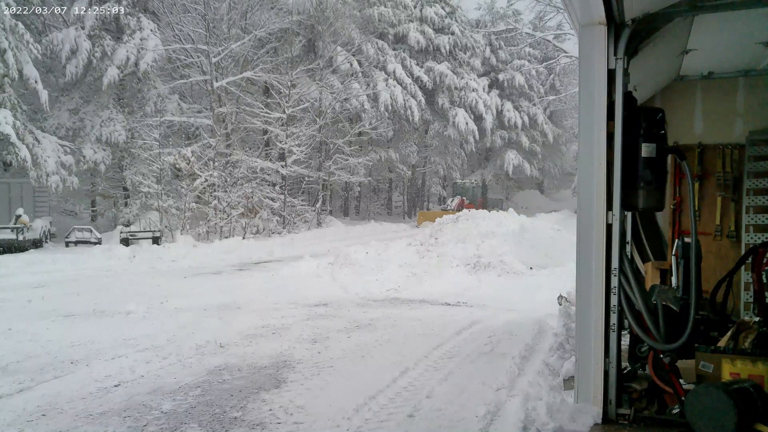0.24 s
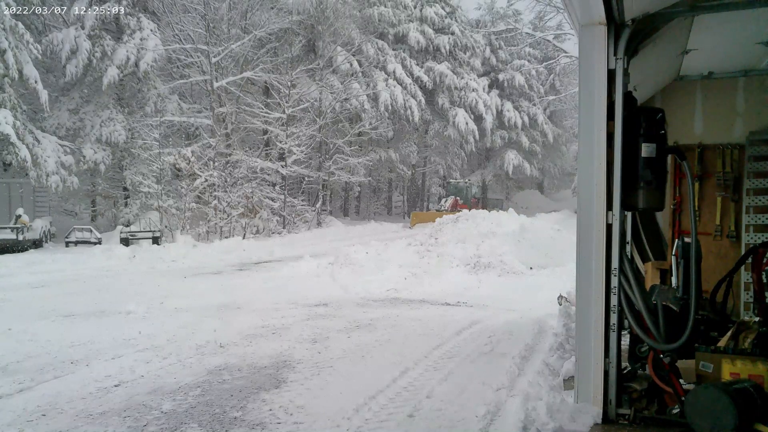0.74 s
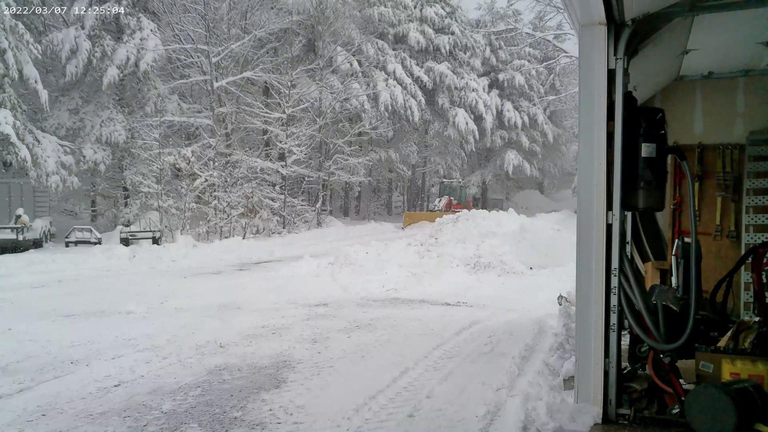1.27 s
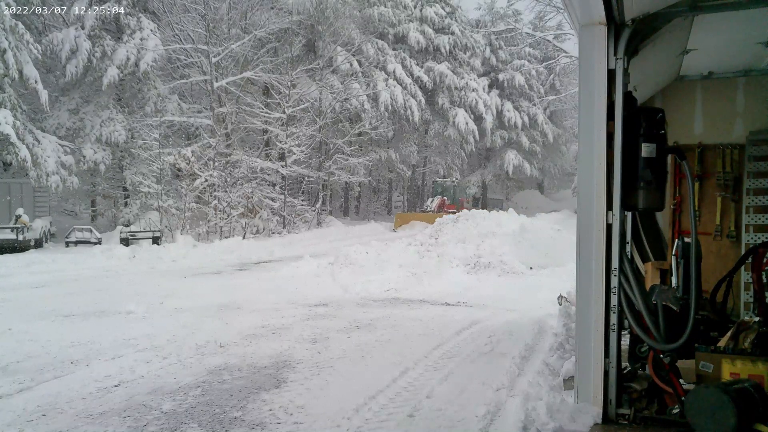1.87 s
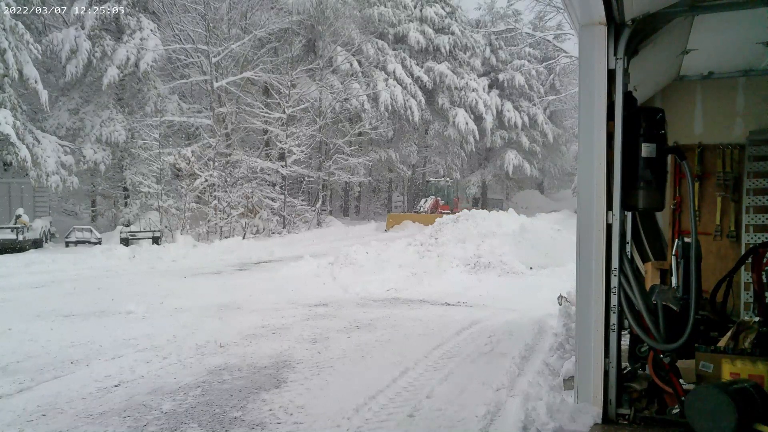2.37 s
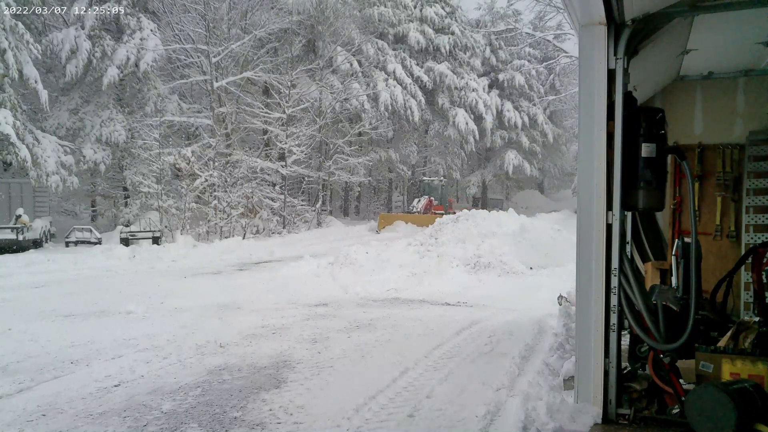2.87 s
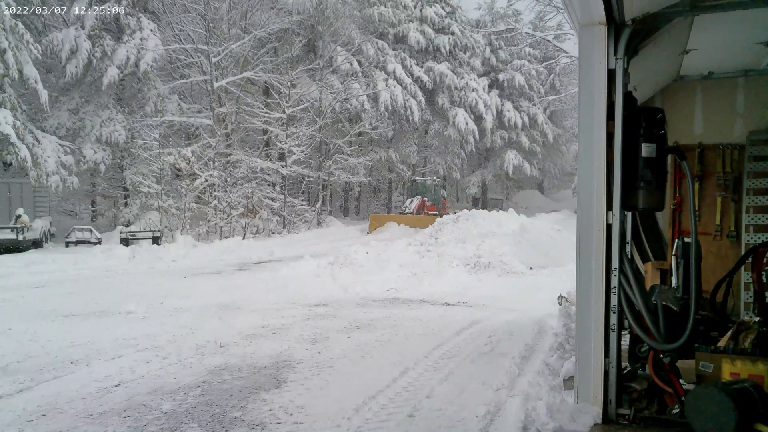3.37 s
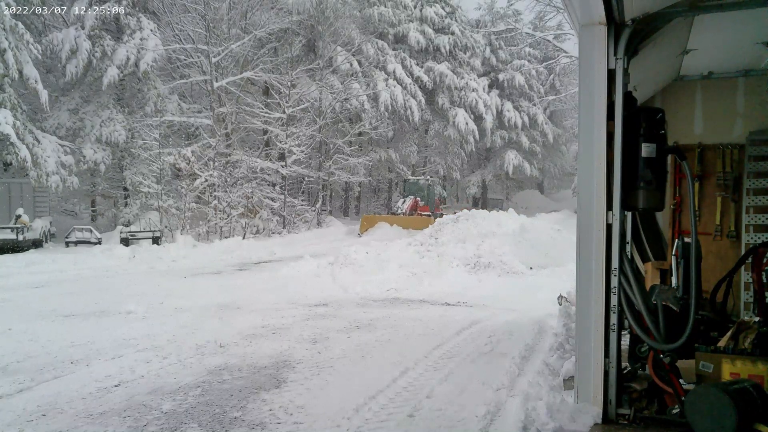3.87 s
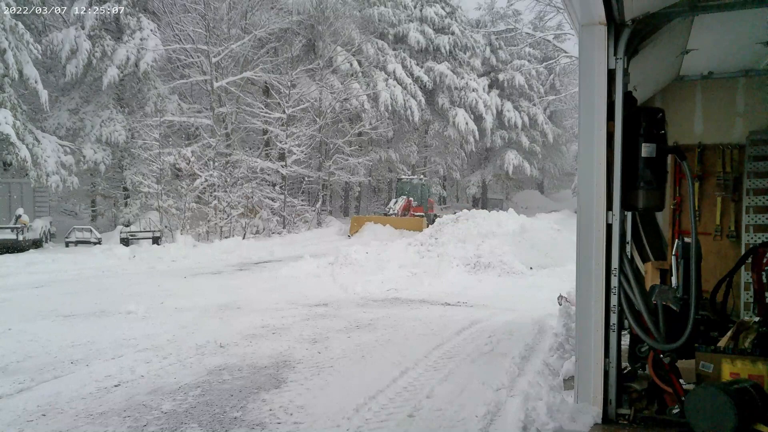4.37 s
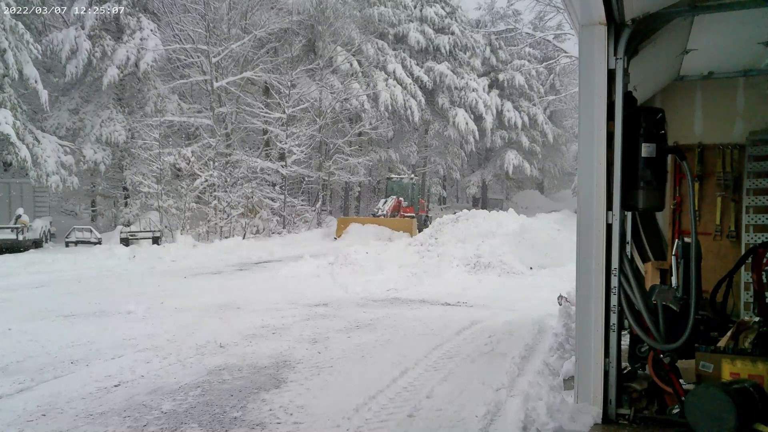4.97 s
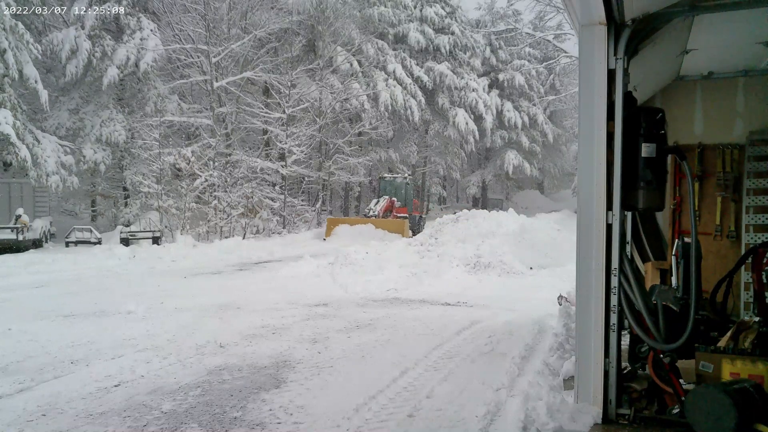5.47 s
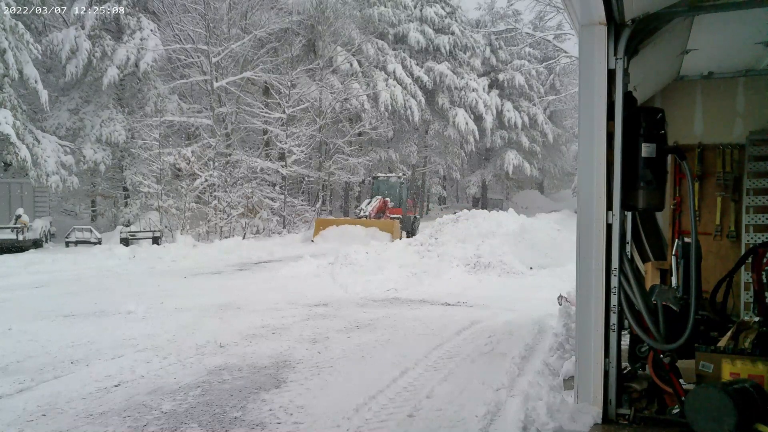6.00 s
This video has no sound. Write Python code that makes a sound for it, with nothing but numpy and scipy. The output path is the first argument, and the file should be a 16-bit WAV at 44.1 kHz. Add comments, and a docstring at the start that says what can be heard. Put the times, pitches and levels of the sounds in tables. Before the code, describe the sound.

A wheel loader's diesel drones from far across a snowy yard, heard from an open garage. Low firing tones sit in a slowly growing noisy roar over a rolling rumble, with a thin wavering gear whine and occasional dull blade thuds. Near the end the blade digs in: crowded bumps, lumpy rumble, steel scrape and ice cracks, while the engine note sags.

```python
"""Far across a yard, a wheel loader pushes wet snow towards an open garage where the microphone stands.
From the start a diesel drones as firing tones in a slowly growing noise roar, over a rolling rumble.
A wavering near-sine gear whine enters at 0.3 s; blade bumps, short decaying rings, come from 0.9 s.
From 4.8 s the blade digs in: a lumpy noise rumble, a scrape, and ice cracks that ring the plate modes.
Bumps crowd together, and after 5.2 s the load drags the firing rate down."""
import sys
import numpy as np
from scipy import signal
from scipy.io import wavfile
from scipy.ndimage import uniform_filter1d

SR = 44100
rng = np.random.default_rng(int(sys.argv[2]) if len(sys.argv) > 2 else 0)


def how_loud(loudness_db):
    """Turn decibels into a plain amplitude multiplier (0 dB gives 1, 20 dB gives 10)."""
    steps = np.asarray(loudness_db, float) / 20
    return 10 ** steps


def materialize(psi):
    """Save the field psi as 16-bit PCM at rate SR to the path in sys.argv[1].

    A 1-D psi becomes a single channel; in a 2-D psi each row is a channel.
    """
    bounded = np.clip(np.atleast_2d(psi).T, -1, 1)
    quanta = np.round(bounded * 32767).astype(np.int16)
    wavfile.write(sys.argv[1], SR, quanta)


N = 275184  # length in samples


def evened(x):
    """Scales a sound to an rms of one."""
    return x / np.sqrt(np.mean(x ** 2) + 1e-20)


def read(points, hz):
    """Reads a spectrum between its points, along a logarithmic frequency axis."""
    f, value = np.transpose(points)
    return np.interp(np.log(hz + 1), np.log(f + 1), value)


def curve(rows, column):
    """Draws one column of a table as straight lines over the whole scene; column 0 is the time."""
    rows = np.array(rows)
    return np.interp(np.arange(N) / SR, rows[:, 0], rows[:, column])


def add(mix, start_s, sound):
    """Lays a sound into the mix, cut off at the end of the scene."""
    part = mix[round(start_s * SR):][:len(sound)]
    part += sound[:len(part)]


def drift(size):
    """Slow chance of rms one, smoothed twice over size samples."""
    return evened(uniform_filter1d(uniform_filter1d(rng.standard_normal(N), size), size))


def noise(spectrum, patchy_db, flicker_db, size, peaks=()):
    """Random short-time spectra with drifting patches and a flicker shared by all bands."""
    frames, hz = 4 * N // size + 5, np.fft.rfftfreq(size, 1 / SR)
    real, imaginary, patches = rng.standard_normal((frames, len(hz), 3)).T
    patches = evened(uniform_filter1d(uniform_filter1d(patches, 9, 0), 7, 1))
    flicker = evened(uniform_filter1d(rng.standard_normal(frames), 3))
    colour_db = read(spectrum, hz)
    for peak_hz, width_hz, db in peaks:
        colour_db = colour_db + db / (1 + (2 * (hz - peak_hz) / width_hz) ** 2)
    level_db = colour_db[:, None] + patchy_db * patches + flicker_db * flicker
    spectra = (real + 1j * imaginary) * how_loud(level_db)
    return evened(signal.istft(spectra, nperseg=size, noverlap=3 * size // 4)[1][:N])


# rolling rumble of tyres and pushed snow, relative: frequency_hz, density_db (per Hz)
GROUND = [(10, -15), (30, 5.5), (45, 4), (65, -26), (100, 3), (135, 3.5), (185, -0.5), (215, -9),
          (300, -15), (400, -61), (600, -68)]


def rolling():
    """Tyres and pushed snow make an uneven low rumble between the engine tones."""
    level_db = -45.5
    return how_loud(level_db) * noise(GROUND, patchy_db=.4, flicker_db=.3, size=2048)


# gear whine before its wavering dips: time_s, level_db
WHINE = [(.3, -67), (.5, -45.5), (.8, -57), (.92, -44), (1.05, -52), (1.15, -49), (1.4, -47), (1.55, -55),
         (1.75, -52), (2.02, -45), (2.3, -60), (2.58, -50), (2.8, -50), (3, -58), (3.28, -47), (3.4, -47.5),
         (3.52, -49), (3.7, -42.5), (3.8, -46), (3.98, -54), (4.2, -43.5), (4.4, -51), (4.52, -54),
         (4.75, -47.5), (5.2, -60), (5.4, -70)]
# gear whine before its wobble: time_s, pitch_hz
WHINE_PITCH = [(0, 1150), (.5, 1162), (.8, 1172), (1.1, 1152), (1.4, 1140), (1.7, 1128), (1.92, 1150),
               (2.2, 1126), (2.6, 1130), (3, 1135), (3.3, 1156), (3.45, 1140), (3.62, 1163), (3.9, 1141),
               (4.25, 1137), (4.5, 1113), (4.75, 1126), (5.15, 1104), (5.4, 1048)]
# third multiple of the gear whine: time_s, level_db
WHINE_THIRD = [(.3, -72), (.52, -62), (.65, -79), (1.1, -68), (1.6, -71), (1.92, -68), (2.2, -65),
               (2.5, -68), (3.2, -68), (3.35, -69), (3.62, -67), (4.15, -66), (4.5, -62.5), (5, -64),
               (5.2, -58), (5.4, -66)]
# thin tones, one list each, before wobble and dips: time_s, pitch_hz, level_db
WHISTLES = [
    [(5.7, 1955, -62), (5.85, 1925, -50), (5.98, 1905, -62)],
    [(5.42, 4040, -66), (5.55, 4010, -69), (5.7, 3915, -67), (5.9, 3890, -73), (6.24, 3915, -68)],
    [(4.85, 3480, -66), (5.1, 3500, -68), (5.5, 3495, -65), (5.85, 3510, -65), (5.95, 3420, -66),
     (6.24, 3400, -64)],
    [(1.6, 3255, -70), (2.2, 3225, -65), (2.4, 3215, -71), (2.85, 3240, -66), (3.5, 3250, -69),
     (3.8, 3240, -75)],
    [(3.24, 940, -56), (3.32, 938, -44), (3.4, 936, -56)],
    [(3.72, 938, -56), (3.8, 936, -45), (3.88, 934, -56)],
]


def whines():
    """Wavering near-sines that come and go; the gear whine carries its third multiple."""
    whistles, t = np.zeros(N), np.arange(N) / SR

    def sounding(rows):
        """A softened gate, open from the first row to the last."""
        return uniform_filter1d(1. * (t > rows[0][0]) * (t < rows[-1][0]), size=1000)

    for rows in WHISTLES:
        phase = 2 * np.pi * np.cumsum(curve(rows, 1) + 7 * drift(size=400)) / SR
        level_db = curve(rows, 2) - 6 * abs(drift(size=700))
        whistles += sounding(rows) * how_loud(level_db) * np.sin(phase)
    phase = 2 * np.pi * np.cumsum(curve(WHINE_PITCH, 1) + 6 * drift(size=1200)) / SR
    level_db = curve(WHINE, 1) - 7 * abs(drift(size=900))
    gear = how_loud(level_db) * np.sin(phase + .5 * drift(size=500))
    third_db = curve(WHINE_THIRD, 1) + 3.5 * drift(size=900)
    gear += how_loud(third_db) * np.sin(3 * phase + .7 * drift(size=250))
    return np.sqrt(2) * (whistles + sounding(WHINE) * gear)  # levels are rms


# firing rate of the diesel: time_s, rate_hz
SPEED = [(0, 85.5), (1, 85.4), (3, 85.3), (5.2, 85.4), (5.42, 78), (5.6, 78.3), (5.8, 79.5), (5.9, 80.3),
         (6.24, 79.8)]
# strength of the firing before it trembles: time_s, firing_tone_db, second_multiple_db
FIRING = [(0.06, -35, -51.5), (0.36, -34.5, -46), (0.62, -38, -50.5), (1.0, -34, -45.5), (1.3, -42, -50),
          (1.46, -33, -45.5), (1.62, -41.5, -48), (2.05, -36, -47), (2.44, -37, -46.5),
          (2.76, -34.5, -41.5), (3.0, -37.5, -46), (3.42, -34, -42), (3.9, -33, -44), (4.1, -35.5, -47),
          (4.36, -30.5, -40.5), (4.54, -39.5, -45), (4.68, -32, -42), (5.1, -29, -38), (5.38, -49, -37),
          (5.5, -32, -31.5), (5.74, -43, -32), (5.83, -38, -43), (5.92, -31.5, -37.5), (6.0, -41.5, -36.5),
          (6.24, -38.5, -37.5)]
# upper multiples: multiple of the firing rate, level_db
OVERTONES = [(5.5, -58), (6, -55), (11, -57), (16.5, -66), (18, -63)]
# engine body and exhaust, relative: frequency_hz, density_db (per Hz)
ROAR_LOW = [(180, -51), (250, -5.5), (350, -12.5), (400, -4.5), (440, -2), (490, 3), (560, 0.5), (600, 1),
            (700, -0.5), (820, -3.5), (950, -0.5), (1080, -4.5), (1200, -46), (1400, -42)]
# resonances of the engine housing: frequency_hz, width_hz, gain_db
HOUSING = [(466.5, 9.5, 6), (551, 31, 1.5), (649, 15, 4.5), (729, 24, 1.5), (780, 12, 6), (858, 12.3, 9)]
# fan and valve train, relative: frequency_hz, density_db (per Hz)
ROAR_HIGH = [(710, -5.5), (1200, 0), (1270, -15.5), (1540, 2), (1830, 2), (2100, -12), (2600, -19),
             (3340, -15), (3710, -18), (4510, -25), (5040, -26.5), (5480, -21), (6540, -32), (10400, -53.5),
             (11100, -62), (14500, -69), (22000, -120)]
# resonances in the upper roar: frequency_hz, width_hz, gain_db
PANELS = [(1318, 52, 15), (1600, 47, 0), (3280, 290, 5), (3700, 90, -3.5), (4520, 390, 7.5),
          (7980, 170, 12), (10490, 350, -1)]


def engine():
    """Firing tones whose strength trembles, over a roar that breathes faintly with every firing."""
    t = np.arange(N) / SR
    phase = 2 * np.pi * np.cumsum(curve(SPEED, 1) + 0.11 * drift(size=1500)) / SR
    tones = how_loud(curve(FIRING, 1) + 1.2 * drift(size=1000)) * np.sin(phase)
    second_phase = 2 * phase + .15 + .15 * drift(size=4000)
    tones += how_loud(curve(FIRING, 2) + 1.1 * drift(size=1600)) * np.sin(second_phase)
    third_db = -65 + 1.5 * t  # grows as the machine nears
    tones += how_loud(third_db + 4 * drift(size=4000)) * np.sin(3 * phase)
    for multiple, db in OVERTONES:  # the long path through moving air blurs the upper multiples
        tones += how_loud(db + 4 * drift(size=2000)) * np.sin(multiple * phase + .8 * drift(size=1200))

    body = noise(ROAR_LOW, patchy_db=1.3, flicker_db=0.4, size=4096, peaks=HOUSING)
    body = body * (1 + 0.12 * np.cos(phase))
    fan = noise(ROAR_HIGH, patchy_db=1.1, flicker_db=0.15, size=1024, peaks=PANELS)
    roar_db = -43 + 0.49 * t + .5 * drift(size=700)  # grows as the machine nears, wavering
    fan_db = -4.5 - 0.0339 * t  # against the body: the treble grows a touch slower
    return np.sqrt(2) * tones + how_loud(roar_db) * (body + how_loud(fan_db) * fan)  # tone levels are rms


# blade bumps: start_s, peak_db, pitch_hz
BUMPS = [(.911, -27, 180), (.922, -29.5, 128), (.968, -31, 107), (1.332, -26, 125), (1.805, -27.5, 111.5),
         (2.494, -27, 168), (3.039, -36.5, 132), (3.58, -33, 132), (3.907, -31, 169.6),
         (3.936, -28.5, 155.4), (4.911, -18, 155.4), (4.956, -27, 151), (4.963, -23, 93), (5.033, -23, 132),
         (5.058, -23.5, 157.6), (5.066, -19.5, 88.7), (5.149, -18, 101.2), (5.162, -15.5, 147.3),
         (5.214, -20, 126), (5.245, -20.5, 170.5), (5.253, -16.5, 94.7), (5.288, -20.5, 95),
         (5.289, -23, 186), (5.32, -20.5, 159.8), (5.325, -19, 94), (5.358, -24.5, 172),
         (5.399, -21.5, 102.3), (5.422, -21.5, 184.3), (5.451, -26, 97), (5.463, -16, 148),
         (5.517, -27, 159), (5.554, -22, 151.5), (5.582, -21.5, 77.7), (5.601, -27, 151), (5.631, -24, 96),
         (5.644, -26, 166), (5.685, -20.5, 112.4), (5.712, -25, 170), (5.745, -27, 154)]
# partials of the ringing blade: factor on the pitch, share
BLADE = [(1, 1), (.74, .35), (1.3, .2)]


def bumps():
    """Each bump softly pushes the heavy blade, which rings briefly with dull neighbours above and below."""
    out, t = np.zeros(N), np.arange(SR // 3) / SR
    t60_s, rise_s = 0.13, .005
    push = how_loud(-60 * t / t60_s) * (1 - np.exp(-t / rise_s)) ** 2
    phases = rng.random((len(BUMPS), 3)) * [0, 1, 1]  # in cycles; the main ring starts from rest
    for (start_s, peak_db, hz), phase in zip(BUMPS, phases):
        ring = np.zeros(len(t))
        for (factor, share), cycles in zip(BLADE, phase):
            ring += share * np.sin(2 * np.pi * (factor * hz * t + cycles))
        bump = push * ring
        add(out, start_s, how_loud(peak_db) * bump / abs(bump).max())
    return out


# large cracks of ice against the plate: start_s, peak_db
CRACKS = [(5.072, -30), (5.138, -31), (5.256, -25), (5.292, -26.5), (5.42, -27), (5.597, -35), (5.622, -28),
          (5.705, -31)]
# the blade plate's modes under breaking ice, for cracks and crunch: pitch_hz, level_db, t60_s
PLATE = [(602, -4, 0.035), (768, 0, 0.035), (966, -3, 0.035), (1650, -5, .03), (1838, -3, 0.029)]


def cracks():
    """Each large crack rings every mode of the plate, in its own mix and slightly shifted in pitch."""
    out, t = np.zeros(N), np.arange(3000) / SR
    chance = rng.random((len(CRACKS), len(PLATE), 3))
    for (start_s, peak_db), draws in zip(CRACKS, chance):
        ring = np.zeros(len(t))
        for (hz, mode_db, t60_s), (weaker, shift, cycles) in zip(PLATE, draws):
            decay = how_loud(mode_db - 8 * weaker - 60 * t / t60_s)
            ring += decay * np.sin(2 * np.pi * (hz * (.93 + .14 * shift) * t + cycles))
        ring = ring * (1 - np.exp(-t / .003))  # soft onset
        add(out, start_s, how_loud(peak_db) * ring / abs(ring).max())
    return out


def crunch():
    """Bits of ice crack against the plate at random; each excites one mode, a few are large."""
    hits_per_s = 220
    size_db = 4.5 * np.minimum(rng.exponential(1, N), 3)
    hits = how_loud(size_db) * (rng.random(N) < hits_per_s / SR)
    mode, t = rng.integers(0, len(PLATE), N), np.arange(3000) / SR
    out = np.zeros(N)
    for k, (hz, db, t60_s) in enumerate(PLATE):
        ring = how_loud(db - 60 * t / t60_s) * (1 - np.exp(-t / 0.0023)) * np.sin(2 * np.pi * hz * t)
        out += signal.oaconvolve(hits * (mode == k), ring)[:N]
    return evened(out)


# blade digging in: time_s, rumble_db
DIG = [(4.8, -40), (4.93, -34), (5, -34), (5.075, -31), (5.12, -30), (5.16, -27.5), (5.32, -27),
       (5.385, -33), (5.43, -31), (5.52, -30), (5.555, -36), (5.59, -30), (5.62, -30), (5.71, -32),
       (5.77, -35), (5.93, -42.5), (5.99, -49), (6.03, -38.5), (6.24, -49)]
# rumble of breaking snow, relative: frequency_hz, density_db (per Hz)
RUMBLE = [(12, -37), (20, -15), (54, -10), (86, -5.5), (156, -8.5), (193, -5), (228, -18.5), (258, -14.5),
          (348, -28), (400, -24.5), (520, -37), (880, -120)]
# the lift frame booms: frequency_hz, width_hz, gain_db
FRAME = [(91, 8.4, 5.5), (246, 36, 3.5)]
# steel dragging: time_s, scrape_db
DRAG = [(4.8, -41), (4.98, -44), (5.01, -39), (5.06, -38.5), (5.08, -37), (5.115, -42), (5.145, -33.5),
        (5.21, -36.5), (5.23, -36), (5.26, -35.5), (5.3, -33.5), (5.395, -38), (5.42, -36), (5.5, -37.5),
        (5.57, -38), (5.62, -36.5), (5.71, -37.5), (5.76, -44.5), (5.83, -41), (5.9, -42.5), (6.24, -40.5)]
# scrape of steel on frozen ground, relative: frequency_hz, density_db (per Hz)
SCRAPE = [(160, -32), (280, -0.5), (353, -12), (387, -38), (542, -3), (594, -5.5), (772, 3), (1400, -14),
          (1770, -3), (2260, -24), (2850, -29.5), (3300, -19.5), (3700, -27), (4000, -28), (5510, -31),
          (6730, -43.5), (11000, -47.5), (14300, -79), (22000, -120)]
# the cutting edge sings: frequency_hz, width_hz, gain_db
EDGE = [(7950, 120, 3), (10440, 600, 7)]


def dig():
    """Packed snow breaks in lumps, a throbbing rumble; steel drags over frozen ground, its treble flickers."""
    fade_in = np.clip((np.arange(N) / SR - DIG[0][0]) / 0.12, 0, 1)
    rumble = noise(RUMBLE, patchy_db=0.5, flicker_db=0.5, size=8192, peaks=FRAME)
    rumble = evened(how_loud(1.2 * drift(size=600)) * rumble)

    scrape = noise(SCRAPE, patchy_db=1.2, flicker_db=.3, size=512, peaks=EDGE)
    highpass = signal.butter(4, 2400, "high", fs=SR, output="sos")
    treble = signal.sosfiltfilt(highpass, scrape)
    grinding = evened(scrape - treble + how_loud(-2.5) * crunch())
    drag_db = curve(DRAG, 1)
    treble_db = uniform_filter1d(drag_db, size=1800) + 1.0 * drift(size=500)
    steel = how_loud(drag_db) * grinding + how_loud(treble_db) * treble
    return fade_in * (how_loud(curve(DIG, 1)) * rumble + steel)


def scene():
    """All layers as heard across the yard, in one channel."""
    return (rolling() + whines() + engine() + bumps() + cracks() + dig())[None]


def top_cut(x):
    """Nothing passes above the cut-off."""
    return signal.sosfilt(signal.butter(12, 15730, fs=SR, output="sos"), x)


def record(dry):
    """The microphone channel: a steep band limit, faint circuit hiss and a small constant offset."""
    edge_hz, hiss_db, offset = 11080, -90.5, -.0017
    lowpass = signal.firwin(301, edge_hz, window=("kaiser", 7), fs=SR)
    limited = signal.oaconvolve(dry, lowpass[None], "same")
    hiss = how_loud(hiss_db) * rng.standard_normal(dry.shape)
    return top_cut(limited + hiss + offset)


dry = scene()
out = record(dry)
materialize(out)
```